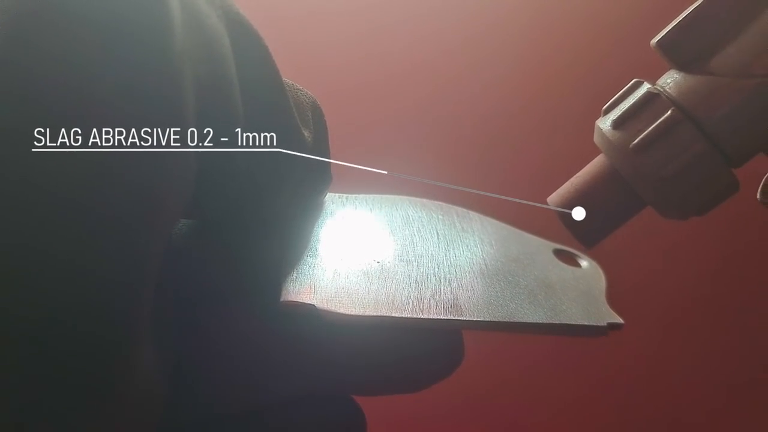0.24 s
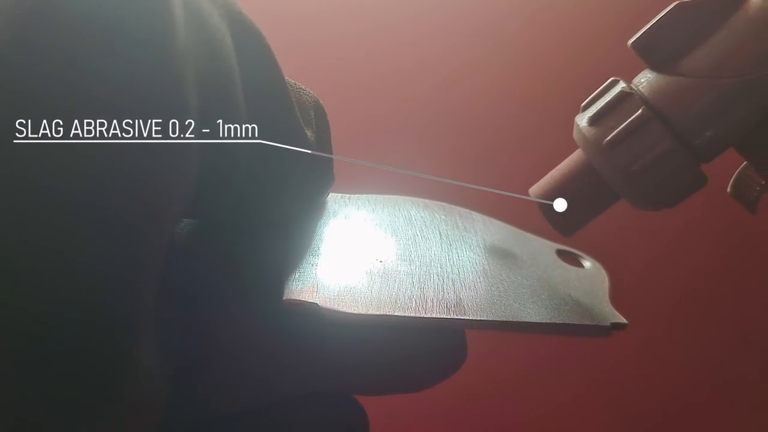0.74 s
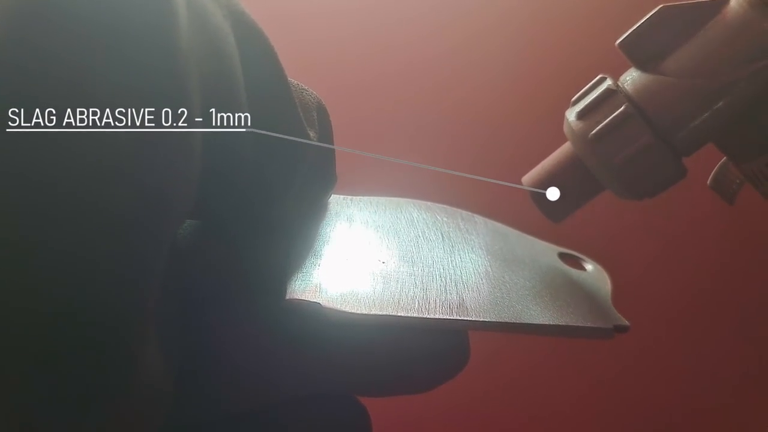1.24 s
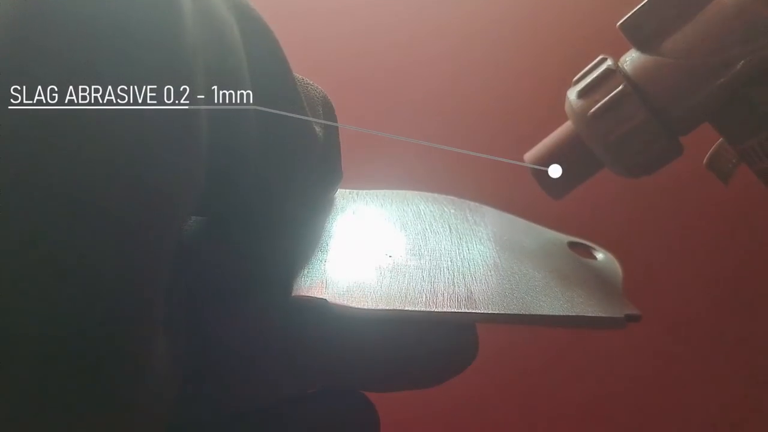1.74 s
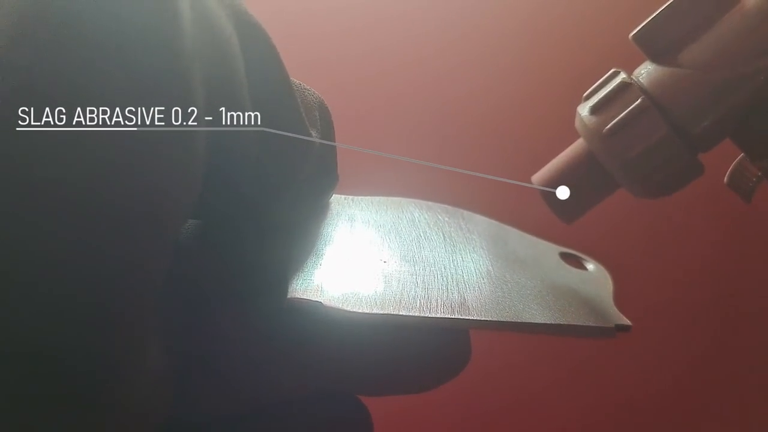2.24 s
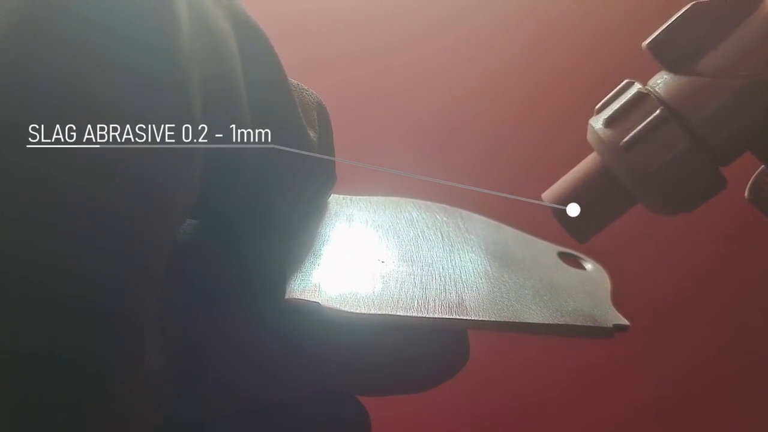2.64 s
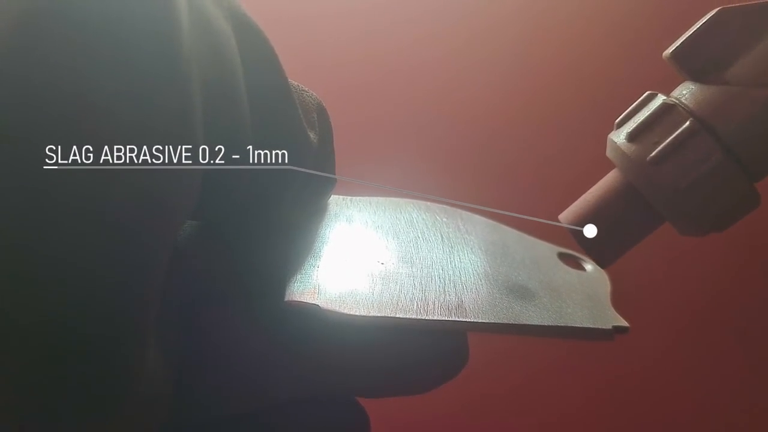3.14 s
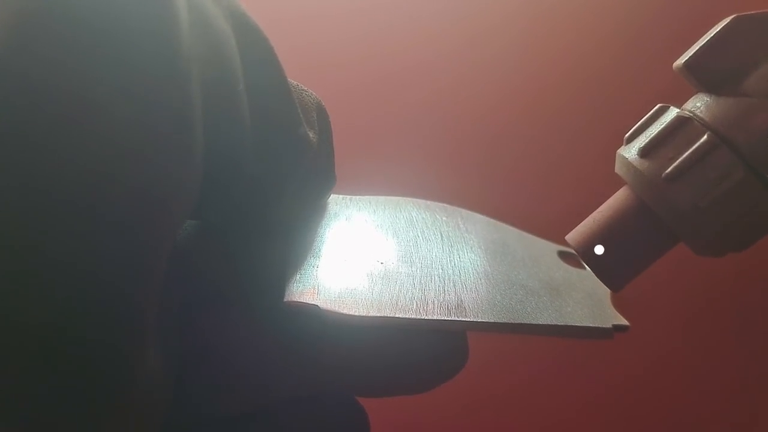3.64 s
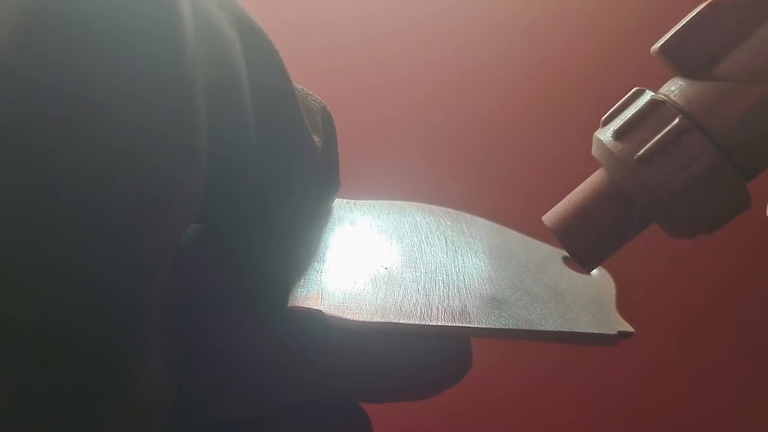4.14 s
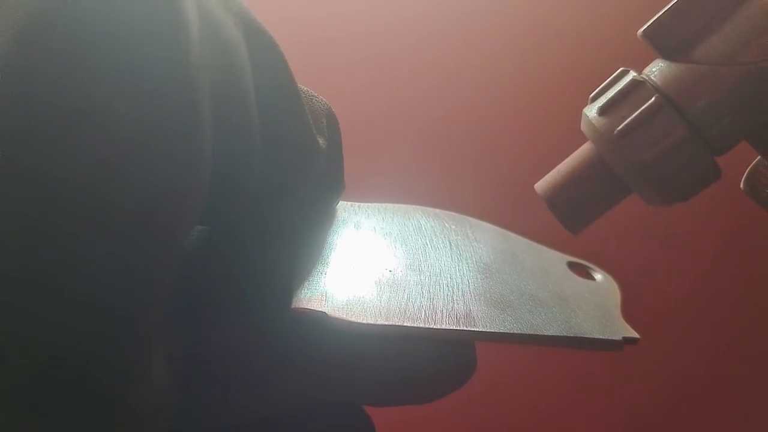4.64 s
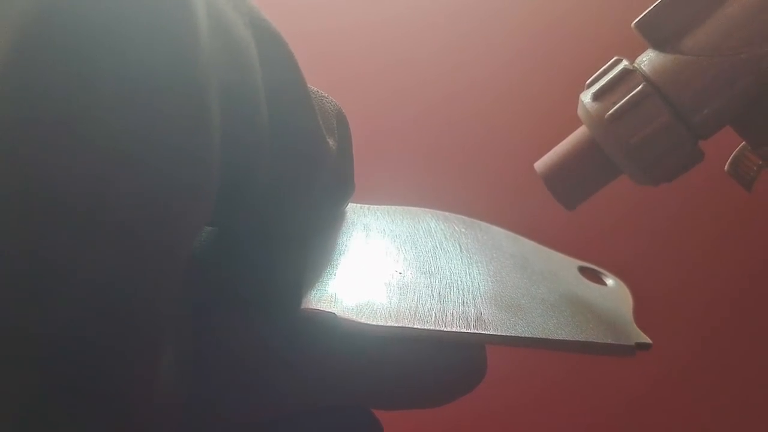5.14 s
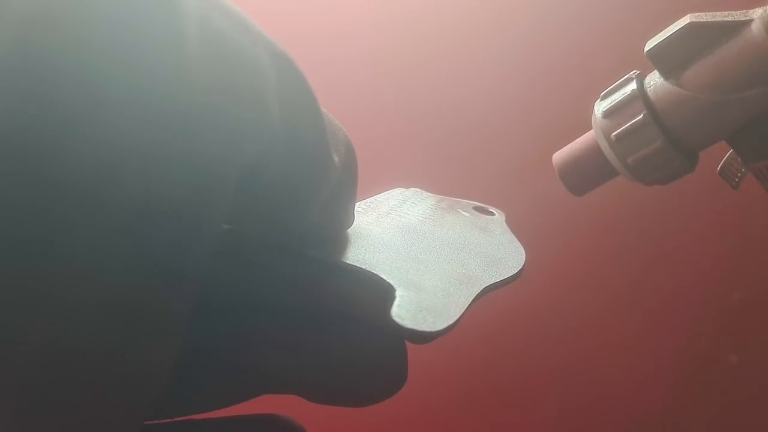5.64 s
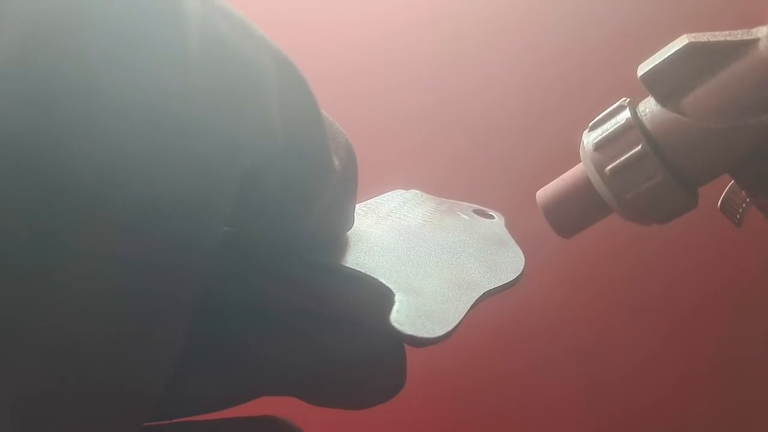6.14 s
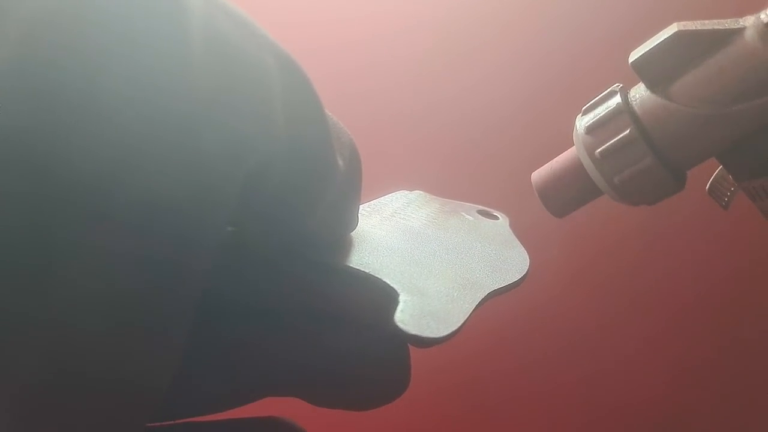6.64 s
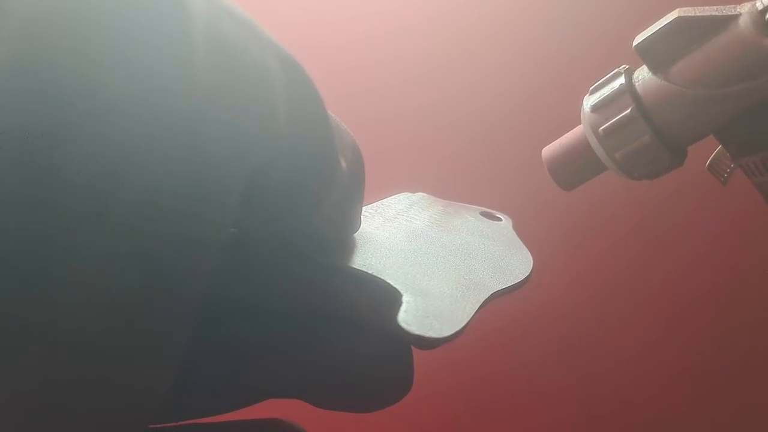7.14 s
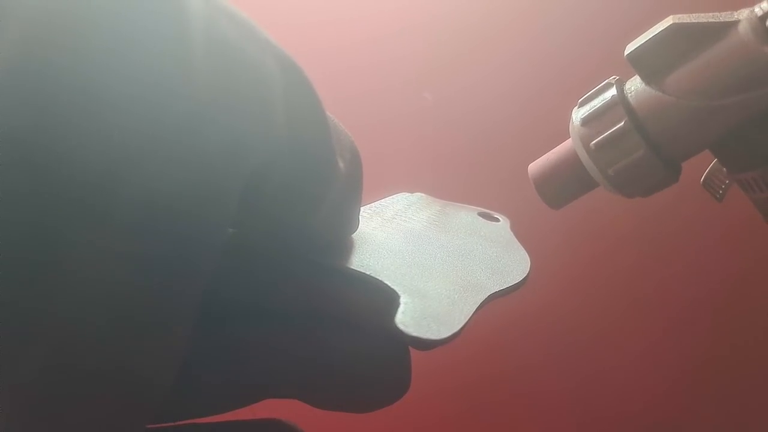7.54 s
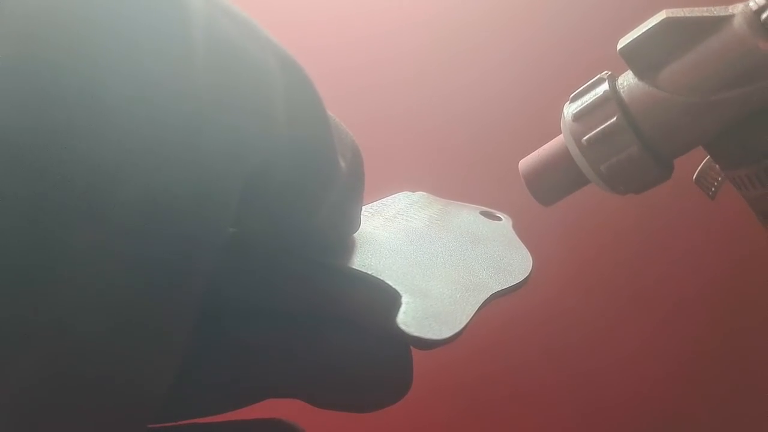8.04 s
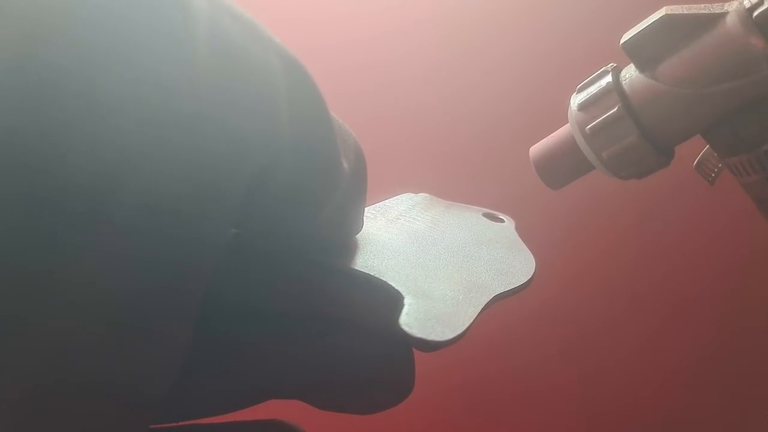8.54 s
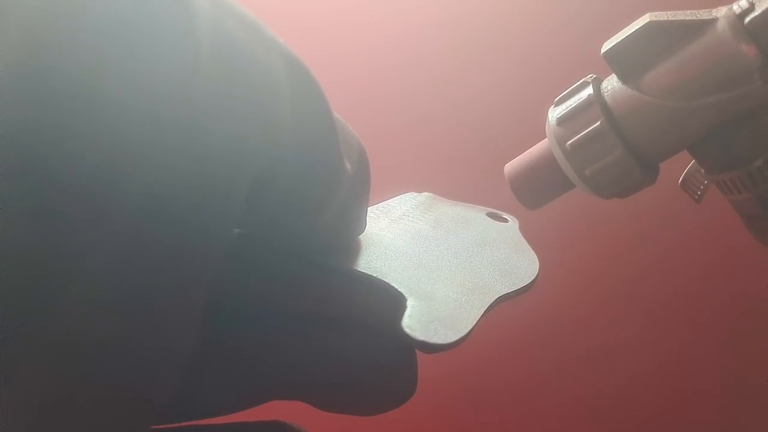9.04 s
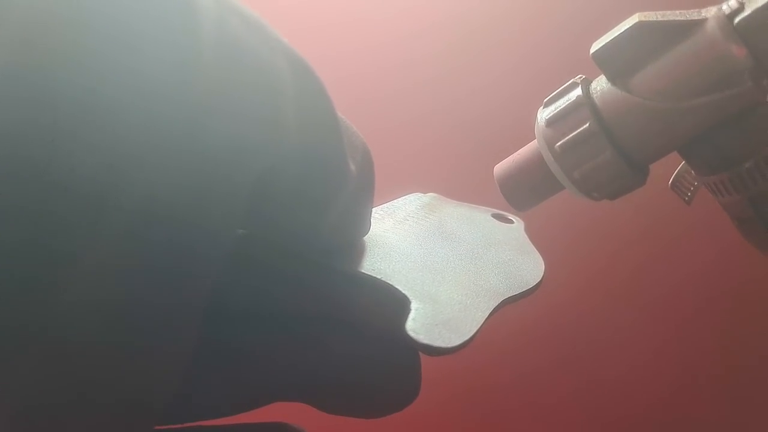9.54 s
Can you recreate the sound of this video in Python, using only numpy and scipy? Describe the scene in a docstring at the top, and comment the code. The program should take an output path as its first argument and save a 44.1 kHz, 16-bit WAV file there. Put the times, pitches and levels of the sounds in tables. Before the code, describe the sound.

Inside a closed blasting cabinet, a compressed-air gun hisses very brightly and continuously while fine grit patters on a gloved, hand-held steel plate. Small ricochet clicks and a faint draught lean to the left at first, with brief gritty bursts. Just past halfway the plate and gun shift: clicks and draught stop, and the patter turns more resonant. A quiet extractor fan hums far beneath. Close stereo microphone.

```python
"""Loudest throughout is a bright, fluttering hiss: a turbulent air jet, of noise shaped in short-time spectra.
A blasting gun sprays grit with it at a hand-held steel plate in a closed cabinet. Random impulses give
the patter and the roar of spent air; short clicks are ricochets; sines and low noise are the extractor fan.
At 5.2 s plate and gun take a new position: colours change, narrow resonances appear, and the draught on
the left microphone port and the ricochets stop."""
import sys
import numpy as np
from scipy import signal
from scipy.fft import rfft, irfft, next_fast_len
from scipy.io import wavfile
from scipy.ndimage import uniform_filter1d, map_coordinates

SR = 44100
rng = np.random.default_rng(int(sys.argv[2]) if len(sys.argv) > 2 else 0)


def magnitude_from_level(level_db):
    """Linear magnitude for a level in decibels (20 dB per decade)."""
    exponent = np.asarray(level_db, float) / 20
    return 10 ** exponent


def bounce(signal):
    """Save signal as a 16-bit WAV file at the path given by the first command-line argument."""
    frames = np.transpose(np.atleast_2d(signal))
    limited = np.clip(frames, -1, 1)
    pcm = np.round(limited * 32767).astype(np.int16)
    wavfile.write(sys.argv[1], SR, pcm)


N = 431722  # length [samples]

FRAME = 2048  # short-time spectrum [samples]
HOP = FRAME // 4
MOVE_S = 5.2  # plate and gun take the second position [s]

# Extractor fan tones: (frequency [Hz], rms level [dB], level wander [dB], phase wander [rad])
FAN_TONES = [(92.5, -68.5, -0.3, 0.1), (322.2, -72.5, 0.6, 0.25), (397, -79, 3.5, 3.3)]
# Rush of ducted air: (frequency [Hz], relative level [dB])
RUSH_COLOUR = [(25, -15), (50, 4), (130, -17.0), (250, -6), (400, -3.5), (490, -9), (600, -20.5)]
# Draught on the left port: (frequency [Hz], relative level [dB])
BUFFET_COLOUR = [(15, -31), (35, -15), (65, 1.5), (130, -6), (300, -14.5), (800, -21.5), (2000, -23.5),
                 (4000, -31)]
# Loud stray grains on the left port: (time [s], peak level [dB])
STRAY_TAPS = [(.1522, -26), (.1785, -30), (.258, -29), (.4925, -37), (.5775, -32), (1.0703, -28),
              (1.2718, -30), (1.3977, -34), (1.4773, -33), (1.7955, -34), (1.8275, -36), (1.8466, -27),
              (1.9135, -31), (2.0935, -33), (2.3105, -40), (2.4716, -38), (3.2445, -31), (4.0574, -32),
              (4.6855, -40)]
# Slugs of packed grit bursting from the nozzle: (middle [s], length [s], rise of the roar [dB])
GRIT_SLUGS = [(0.17, 0.12, 1), (1.54, 0.088, 8), (1.61, 0.06, 7.5), (1.693, 0.067, 5.5), (1.826, 0.11, 8),
              (1.92, 0.06, 0.5), (4.007, 0.042, 3), (5.584, 0.17, 2)]
# Stream sweeping over the plate: (time [s], low patter level [dB], bright patter level [dB])
PATTER_COURSE = [(0.0, -55.5, -48), (0.45, -58, -50.5), (0.8, -56.5, -50), (1.15, -56, -46.5),
                 (1.4, -56.5, -47.5), (1.7, -57, -46), (1.95, -58, -47.5), (2.4, -56.5, -50),
                 (2.95, -56.5, -48.5), (3.5, -56, -48), (3.85, -55.5, -47), (4.1, -58, -48),
                 (4.6, -55.5, -50.5), (5.17, -57, -49), (5.24, -54.5, -46), (5.45, -54, -44.5),
                 (5.62, -53, -42.5), (5.9, -57, -49), (6.3, -59, -49.5), (6.65, -57, -50),
                 (6.95, -53.5, -48.5), (7.05, -52, -45.5), (7.14, -51.5, -43), (7.22, -52, -46.5),
                 (7.35, -54, -49), (7.85, -57, -51), (8.45, -53.5, -47.5), (8.95, -55, -49.5),
                 (9.4, -52.5, -48), (9.79, -55.5, -48.5)]
# Low patter, first and second position: (frequency [Hz], relative level [dB])
DULL_COLOURS = [
    [(820, -52), (1400, -9.5), (2010, -5.5), (2600, -5), (2820, -3.5), (3370, -3), (3740, -3), (4300, -2),
     (5590, -7), (9460, -120)],
    [(820, -59), (1400, -20), (1550, -5), (1790, -8), (2000, -8.5), (2530, -6), (2900, -6), (3420, 0.5),
     (3820, -0.5), (4300, -11.5), (5590, -33), (9460, -120)],
]
# Bright patter, first and second position: (frequency [Hz], relative level [dB])
BRIGHT_COLOURS = [
    [(2470, -17.5), (4200, -6), (5150, -5), (5780, 0), (6980, 1), (8010, -4.5), (8500, -5), (11000, -41),
     (18700, -120)],
    [(2470, -28), (4200, -4.5), (4740, -2), (5790, -2), (6810, 0.5), (8230, -6), (8500, -23), (11000, -38),
     (18700, -120)],
]
# Roar of spent air, first and second position: (frequency [Hz], relative level [dB])
ROAR_COLOURS = [
    [(20, -23), (35, -5), (60, -2.5), (200, -2), (450, 0), (600, -1.5), (1000, -1.5), (1450, -5.5),
     (1600, -23)],
    [(20, -14), (35, -12), (60, -3), (200, -8), (450, -4.5), (550, -10), (700, -5.5), (850, -6), (1170, -6),
     (1300, -2), (1450, 0.5), (1600, -29)],
]
# Cabinet resonances with the plate further from the gun: (centre [Hz], width [Hz], rise [dB])
CABINET_RINGS = [(490, 30, 5.5), (605, 30, 3.5), (704, 38, 6), (925, 40, 5), (1086, 60, 5.5),
                 (1302, 40, 4.5), (1470, 44, 3.5), (1880, 59, 7), (2110, 41, 5), (2302, 27, 12),
                 (2480, 39, 12), (2560, 27, 8), (2710, 54, 9), (3017, 60, 7.5), (3390, 180, 4),
                 (4550, 72, 2)]
# Acoustic shadow of glove and gun, first and second position: (frequency [Hz], left-right difference [dB])
SHADOW_BALANCE = [
    [(1500, 0.5), (3000, 2), (4000, -4.5), (5500, -2), (6500, -10.5), (8000, -5.5), (9800, -4),
     (11500, -10), (12500, -8.5), (13800, -4), (15500, -6)],
    [(1500, -1.5), (3500, 0), (4500, -3), (5500, -15), (7000, -16), (8200, -7), (9200, -1.5), (9900, -10),
     (10500, -9), (11500, -9), (12500, -10), (13700, -7.5), (14700, -3), (15600, 0)],
]
# Air jet: (time [s], hiss level [dB], left-right shift [dB], brightening [dB per octave])
JET_COURSE = [(0.0, -32, 2, 5), (0.5, -32.5, 1.5, 8.5), (0.98, -31.5, 4, 9.5), (1.6, -32.5, -0.5, 3.5),
              (2.24, -32.5, 2.5, 8.5), (3.0, -32.5, 2.5, 9.5), (3.7, -31.5, 0, 8.5), (4.4, -32, 2, 5.5),
              (5.1, -32, 2, 9), (5.26, -33.5, -2, 5.5), (6.2, -33, 0, 5.5), (7.2, -33, -1, 7.5),
              (8.4, -33, -1, 7), (9.73, -33, 0, 6.5), (9.79, -30.5, 2, 13)]
# Jet hiss before brightening: (frequency [Hz], relative level [dB])
HISS_COLOUR = [(4880, -39), (8300, -14.5), (9800, -5.5), (11000, -0.5), (11900, 2), (12800, 1.5),
               (13500, 0), (14300, -1.5), (15000, -4), (15760, -9)]

DRAUGHT_DB, GUSTS_DB, GUSTS_PER_S = -60, 1, 6.5  # level on the left port, depth and pace of its gusts
ROAR_DB = (-65.5, -65)  # roar outside slugs, before surges; first and second position
SLUG_DULL, SLUG_BRIGHT = 0.8, 0.1  # rise of each patter [dB per dB of roar rise]
FOCUS_HZ, FOCUS_WIDTH_HZ = 4540, 1000  # band that louder bright patter favours, 1/e half-width
FOCUS_GAIN, CALM_DB = 0.33, -51.5  # emphasis [dB per dB above the calm level], calm level [dB]
LIMIT, KNEE = 0.16, 4  # camera's peak limiter: ceiling (full scale 1) and hardness
TOP_HZ = 15780  # camera's band limit


def table(points, at, log=True):
    """Interpolation of tabulated columns on a logarithmic or linear axis."""
    x, *columns = np.transpose(points)
    if log:
        x, at = np.log(x + 1), np.log(at + 1)
    return np.array([np.interp(at, x, column) for column in columns])


def unit(x):
    """Normalisation to unit rms."""
    return x / np.sqrt(np.mean(np.abs(x) ** 2) + 1e-20)


def wobble(rate, at):
    """Slow random modulation: a spline through normal random knots, rate of them a second."""
    knots = rng.standard_normal(int(N * rate / SR) + 6)
    return map_coordinates(knots, [at * rate])


def frames(x):
    """Short-time Fourier analysis: frequencies, times and spectra."""
    return signal.stft(x, SR, nperseg=FRAME, noverlap=FRAME - HOP)


def sound(z):
    """Overlap-add synthesis of samples from short-time spectra."""
    return signal.istft(z, SR, nperseg=FRAME, noverlap=FRAME - HOP)[1][..., :N]


def by_position(pair, hz, t):
    """Dependence of a spectrum [dB] on geometry: it switches when the plate is moved."""
    first, second = (table(points, hz)[0][:, None] for points in pair)
    return np.where(t < MOVE_S, first, second)


def coloured(db, hz):
    """Spectral shaping at constant power: gains whose mean square is 1 in every frame."""
    gain = magnitude_from_level(db)
    return gain / np.sqrt(np.mean(gain ** 2, axis=0))


def cabinet(t, t60, drift, moving):
    """Multipath interference: echo paths to both ports, part fixed per position, part drifting with the hand.

    t60 is the echo decay time [s], drift the pace [hand poses a second], moving the drifting power share."""
    decay = magnitude_from_level(-60 * np.arange(FRAME // 2) / SR / t60)

    def path(count):
        echoes = rng.standard_normal((2, count, FRAME // 2)) * decay
        return rfft(echoes, FRAME).swapaxes(1, 2) / np.linalg.norm(decay)

    still = path(count=2)[..., (t >= MOVE_S) * 1]
    knot, share = np.divmod(t * drift, 1)
    knot = knot.astype(int)
    poses = path(count=knot[-1] + 2)
    turn = share * np.pi / 2  # equal-power fade from one hand pose to the next
    drifting = poses[..., knot] * np.cos(turn) + poses[..., knot + 1] * np.sin(turn)
    moving = np.clip(moving, 0, 1)
    paths = np.sqrt(moving) * drifting + np.sqrt(1 - moving) * still
    # Divide out the broad colour of the paths, leaving fine ripples only
    return paths / np.sqrt(uniform_filter1d(np.abs(paths) ** 2, size=28, axis=1))


def spray(source, t60, drift, moving, spread):
    """Direct and diffuse fields: a point source through echo paths, plus noise unrelated at the two ports.

    spread is the diffuse power share at high frequencies; it grows towards low ones."""
    hz, t, z = frames(unit(source))
    scattered = frames(rng.standard_normal((2, N)))[2]
    low_excess = 0.64 / (1 + (hz[:, None] / 900) ** 2)  # low air noise comes from everywhere
    spread = np.clip(spread + (1 - spread) * low_excess, 0, 1)
    direct = z * cabinet(t, t60, drift, moving)
    return hz, t, np.sqrt(1 - spread) * direct + np.sqrt(spread) * scattered


def ports(left_right_db):
    """Level difference between two ports, as a pair of gains set by their power ratio."""
    ratio = magnitude_from_level(left_right_db) ** 2
    return 2 * np.sqrt(np.array([ratio, np.ones_like(ratio)]) / (1 + ratio))


def rings(hz, t):
    """Resonance: narrow steady peaks [dB] of the cabinet in the second position."""
    rise_db = sum(db / (1 + (2 * (hz - centre) / width) ** 2) for centre, width, db in CABINET_RINGS)
    return np.outer(rise_db, t >= MOVE_S)


def slugs(t):
    """Transient mass flow: the rise [dB] of each slug swells and fades in a bell shape."""
    return sum(db * np.exp(-(2 * (t - middle) / length) ** 2) for middle, length, db in GRIT_SLUGS)


def fan():
    """Periodic motor and blade forces give tones, alike at both ports; duct turbulence gives a low rush."""
    now = np.arange(N) / SR
    tones = 0
    for tone_hz, db, wander_db, turn in FAN_TONES:
        level = np.sqrt(2) * magnitude_from_level(db + wander_db * wobble(7.3, now))
        tones = tones + level * np.sin(2 * np.pi * tone_hz * now + turn * wobble(7, now))
    hz, t, z = frames(rng.standard_normal(N))
    rush = sound(z * coloured(table(RUSH_COLOUR, hz).T, hz))
    return tones + magnitude_from_level(-71.5) * rush


def draught():
    """Flow noise: air deflected by the plate buffets mainly the left port until the plate is moved."""
    flutter = magnitude_from_level(0.71 * wobble(18, np.arange(N) / SR))
    hz, t, z = frames(rng.standard_normal(N) * flutter)
    level = magnitude_from_level(DRAUGHT_DB + GUSTS_DB * wobble(GUSTS_PER_S, t)) * (t < MOVE_S)
    buffeting = sound(z * coloured(table(BUFFET_COLOUR, hz).T, hz) * level)
    return buffeting * magnitude_from_level([[1], [-26]])  # left and right [dB]


def ricochets():
    """Impulse excitation: rebounding grains tap the ports, denser in each slug, until the plate is moved.

    A few loud clicks fall on the left port and many faint ones on both."""
    now = np.arange(N) / SR
    crowding = magnitude_from_level(1.8 * slugs(now)) * (now < MOVE_S)
    chance = np.outer([190, 110], crowding) / SR  # grains a second outside slugs, left and right
    hits = rng.random((2, N)) < chance
    blows = hits * rng.standard_normal((2, N)) * magnitude_from_level([[-44], [-45]])
    s, db = np.transpose(STRAY_TAPS)
    blows[0] += np.bincount((s * SR).astype(int), magnitude_from_level(db), N)
    t = np.arange(-20, 200) / SR
    push = np.exp(-(t / 6e-5) ** 2)
    swing_back = 0.077 * (t > 0) * np.exp(-t / 4e-4)  # the membrane returns
    click = push - swing_back
    return signal.fftconvolve(blows, click[None], axes=1)[:, 20:N + 20]


def grit():
    """Random impact noise: grains of mixed size in surges patter on the plate and stir the air in the box."""
    now = np.arange(N) / SR
    hits = rng.random(N) < 6000 / SR  # 6000 grains a second on average
    size_db = 2.1 * np.minimum(rng.standard_exponential(N), 4.0)
    strikes = hits * rng.standard_normal(N) * magnitude_from_level(size_db)
    source = strikes * magnitude_from_level(0.91 * wobble(25, now))
    hz, t, z = spray(source, t60=0.17, drift=1.8, moving=0.75, spread=0.19)

    slug_db = slugs(t)
    ring_db = rings(hz, t)
    surge = wobble(7.1, t)  # the feed of grit is uneven
    dull_db, bright_db = table(PATTER_COURSE, t, log=False) + np.outer([SLUG_DULL, SLUG_BRIGHT], slug_db)
    roar_db = np.where(t < MOVE_S, *ROAR_DB) + slug_db
    focus = np.exp(-((hz - FOCUS_HZ) / FOCUS_WIDTH_HZ) ** 2)
    focus_db = FOCUS_GAIN * np.outer(focus, bright_db - CALM_DB)

    dull = coloured(by_position(DULL_COLOURS, hz, t) + ring_db, hz)
    dull = dull * magnitude_from_level(dull_db + 0.65 * surge + 0.16 * wobble(28, t))
    bright = coloured(by_position(BRIGHT_COLOURS, hz, t) + ring_db + focus_db, hz)
    bright = bright * magnitude_from_level(bright_db + 0.2 * surge + 0.37 * wobble(16, t))
    roar = coloured(by_position(ROAR_COLOURS, hz, t) + ring_db, hz)
    roar = roar * magnitude_from_level(roar_db + 0.29 * surge + 1.0 * wobble(14, t))
    gain = np.sqrt(dull ** 2 + bright ** 2 + roar ** 2)  # powers add
    return sound(z * gain * ports(by_position(SHADOW_BALANCE, hz, t)))


def jet():
    """Turbulent mixing: air leaving the nozzle radiates a bright broadband hiss that flutters a little."""
    hz, t, z = spray(rng.standard_normal(N), t60=0.062, drift=2.1, moving=0.78, spread=0.36)
    level_db, shift_db, tilt_db = table(JET_COURSE, t, log=False)
    level_db = level_db + 0.58 * wobble(6, t) + 0.24 * wobble(13, t)
    octaves = np.log2(np.clip(hz, 9000, 16000) / 12500)[:, None]
    # The gun's angle to the ports tilts the hiss
    colour = coloured(table(HISS_COLOUR, hz).T + tilt_db * octaves, hz)
    balance = ports(by_position(SHADOW_BALANCE, hz, t) + shift_db)
    return sound(z * colour * magnitude_from_level(level_db) * balance)


def scene():
    """Superposition of all sources at the two microphone ports."""
    return fan() + draught() + ricochets() + grit() + jet()


def roll_off(x):
    """The treble ends steeply here."""
    return signal.sosfilt(signal.butter(12, 16380, fs=SR, output="sos"), x)


def record(dry):
    """Amplitude limiting and band limiting: the camera rounds off peaks and keeps nothing above its band."""
    envelope = np.abs(signal.hilbert(dry, next_fast_len(N))[:, :N])
    limited = dry / (1 + (envelope / LIMIT) ** KNEE) ** (1 / KNEE)
    in_band = np.fft.rfftfreq(N, 1 / SR) < TOP_HZ
    kept = irfft(rfft(limited) * in_band, N)
    return roll_off(kept)


dry = scene()
out = record(dry)
bounce(out)
```